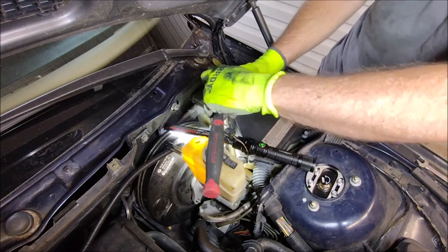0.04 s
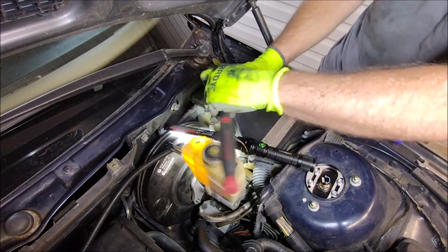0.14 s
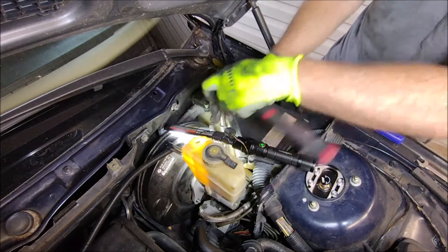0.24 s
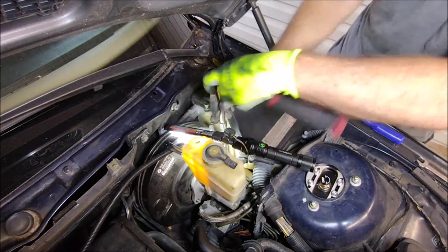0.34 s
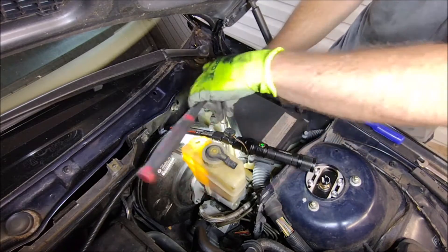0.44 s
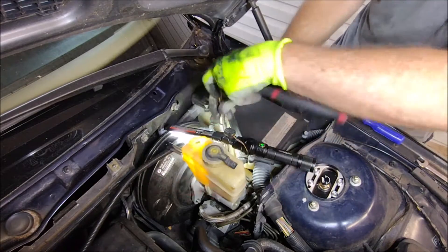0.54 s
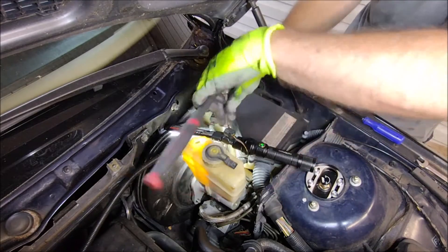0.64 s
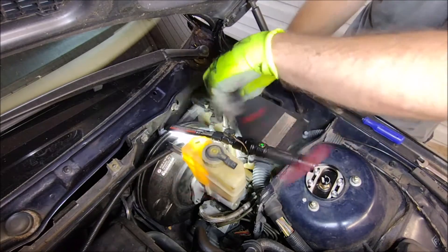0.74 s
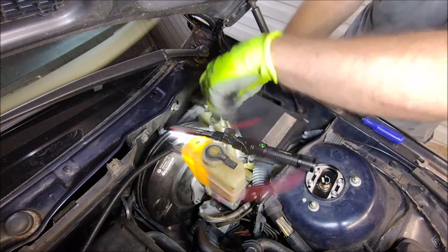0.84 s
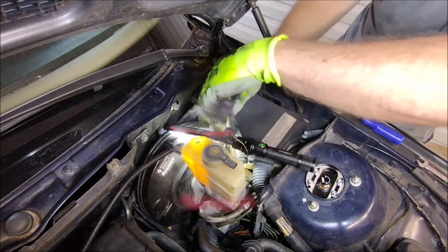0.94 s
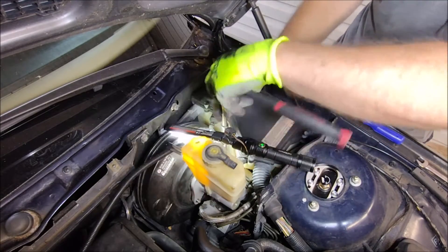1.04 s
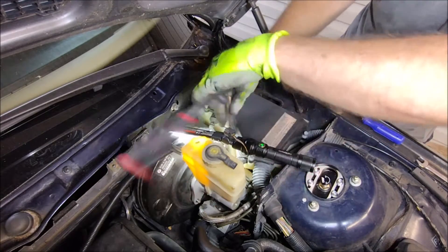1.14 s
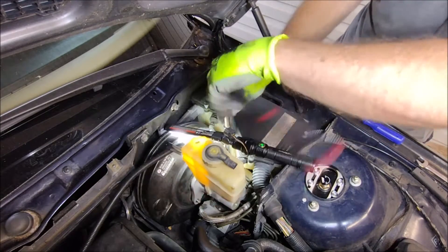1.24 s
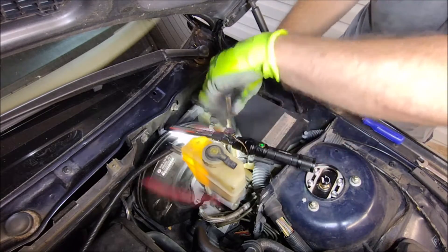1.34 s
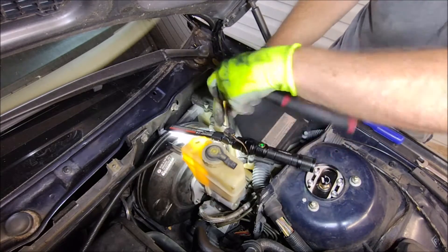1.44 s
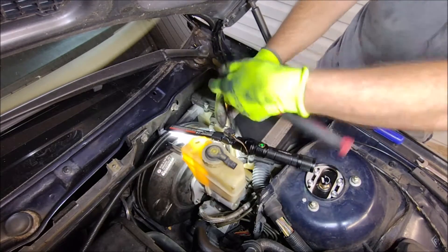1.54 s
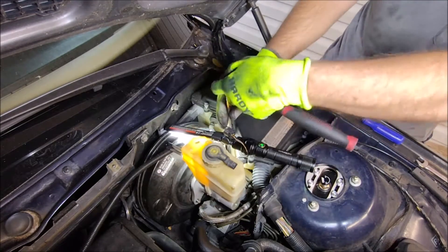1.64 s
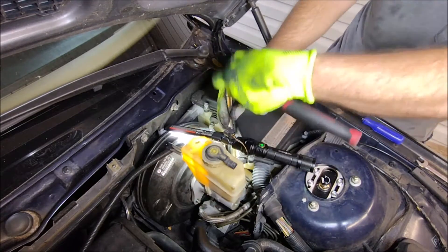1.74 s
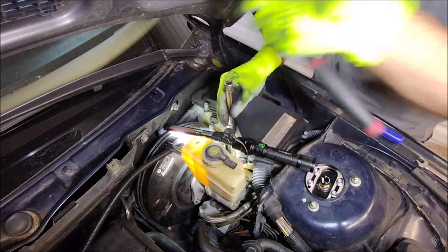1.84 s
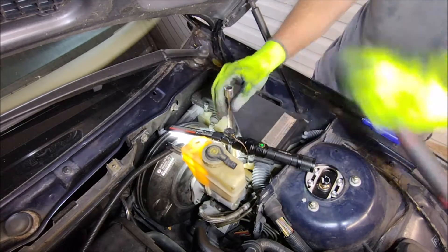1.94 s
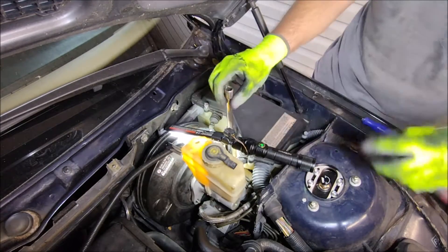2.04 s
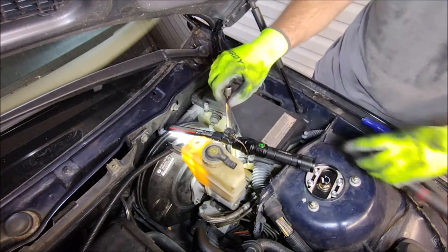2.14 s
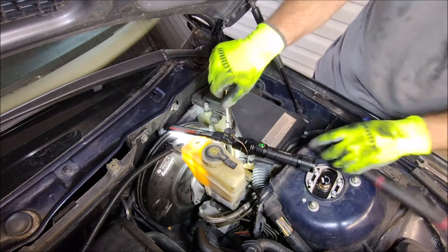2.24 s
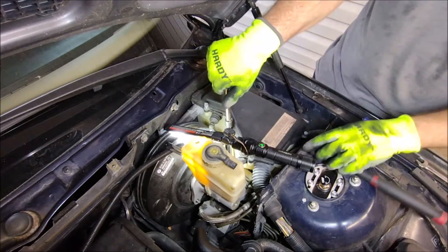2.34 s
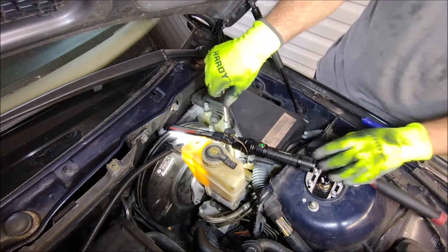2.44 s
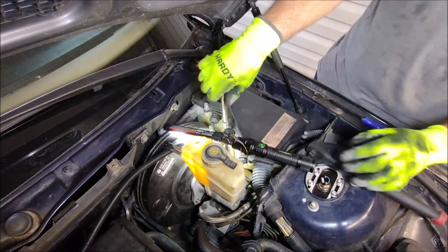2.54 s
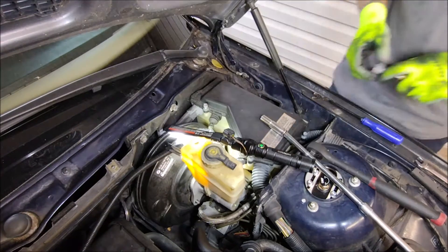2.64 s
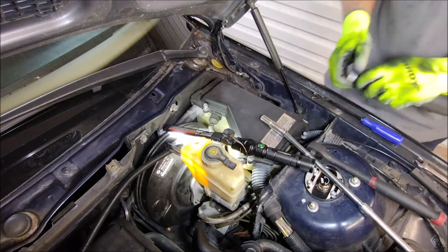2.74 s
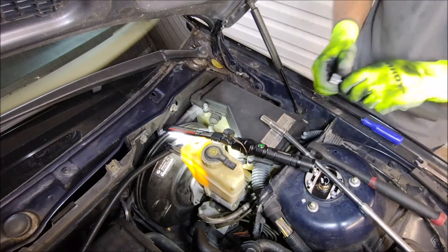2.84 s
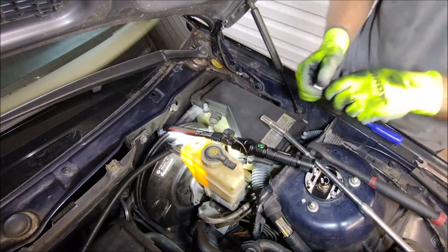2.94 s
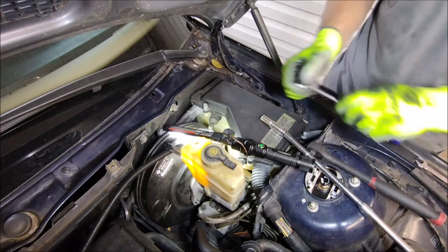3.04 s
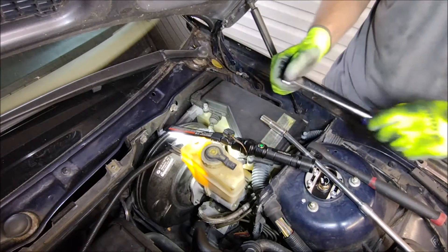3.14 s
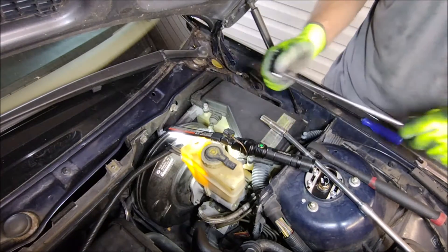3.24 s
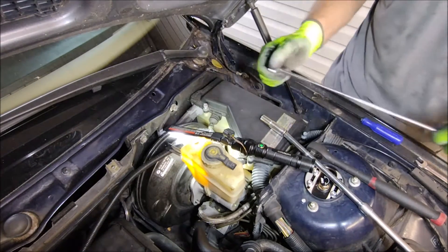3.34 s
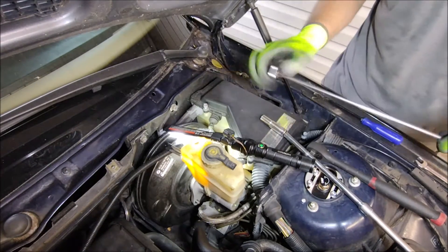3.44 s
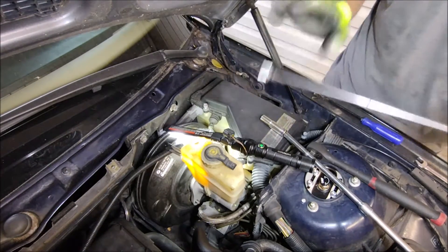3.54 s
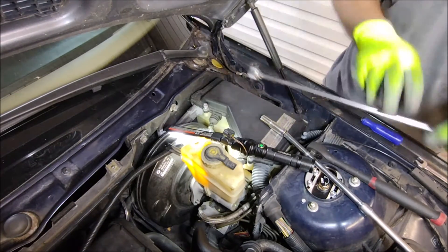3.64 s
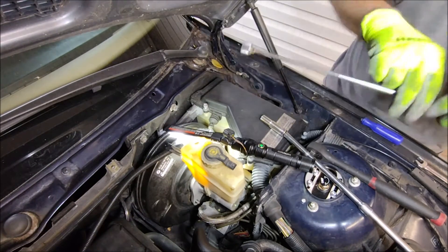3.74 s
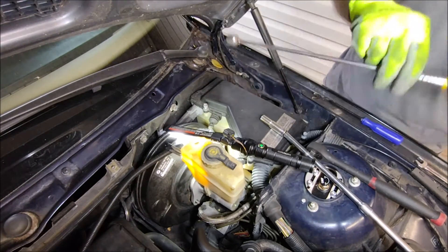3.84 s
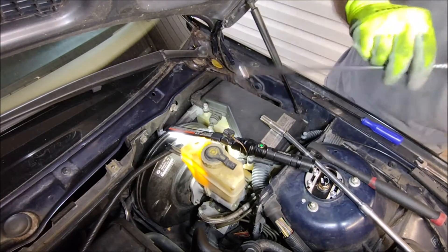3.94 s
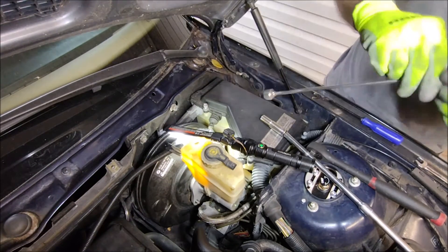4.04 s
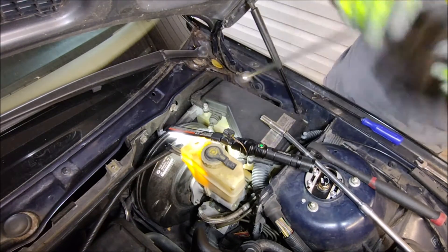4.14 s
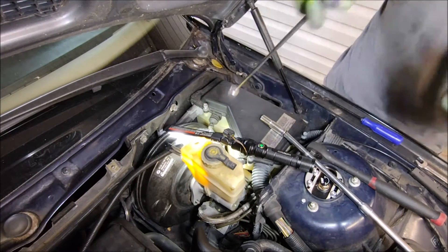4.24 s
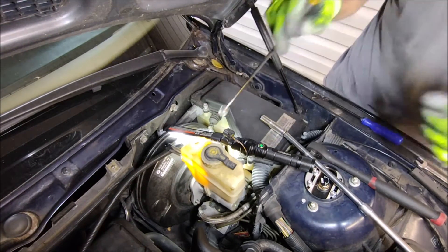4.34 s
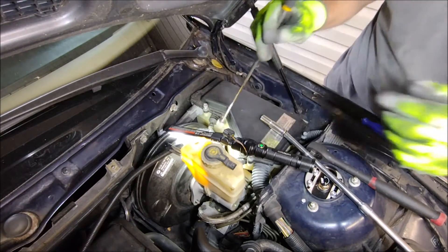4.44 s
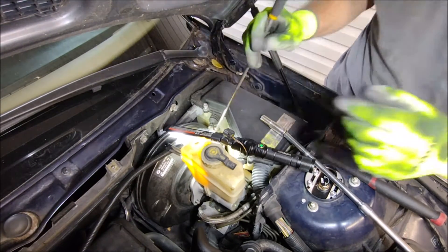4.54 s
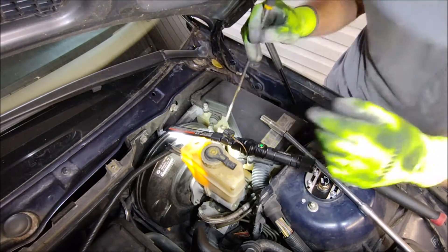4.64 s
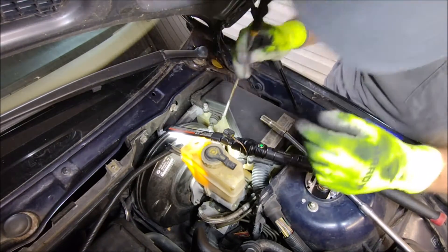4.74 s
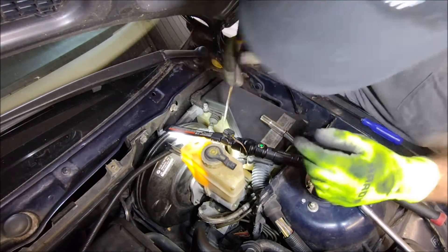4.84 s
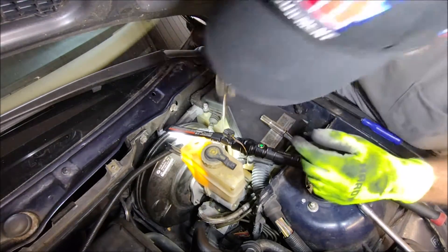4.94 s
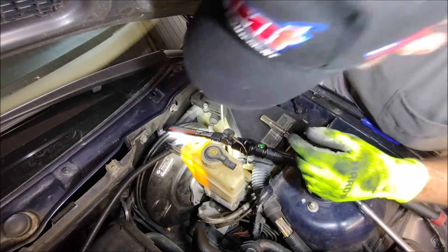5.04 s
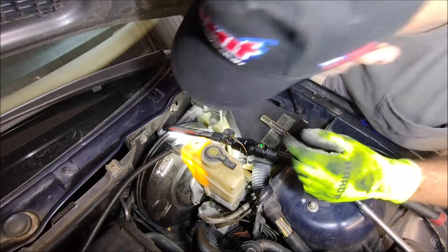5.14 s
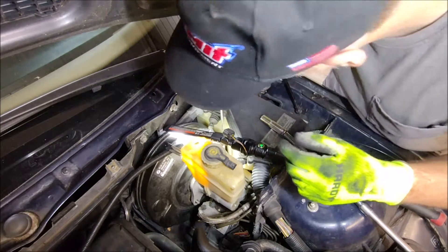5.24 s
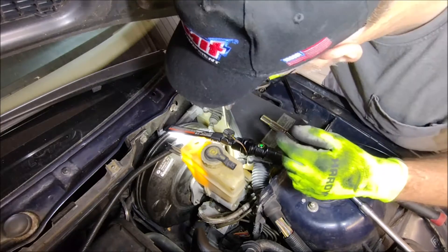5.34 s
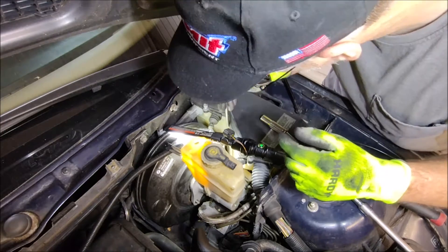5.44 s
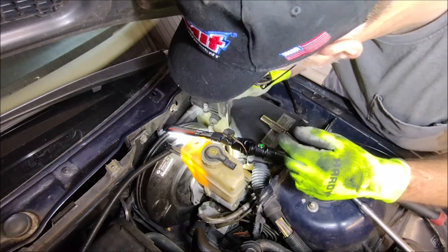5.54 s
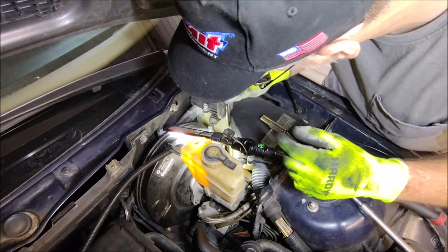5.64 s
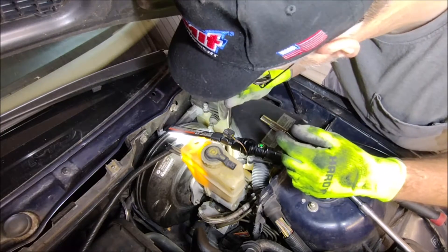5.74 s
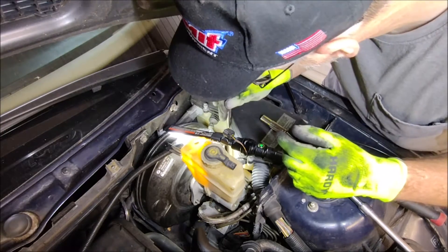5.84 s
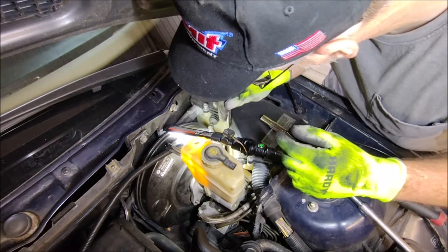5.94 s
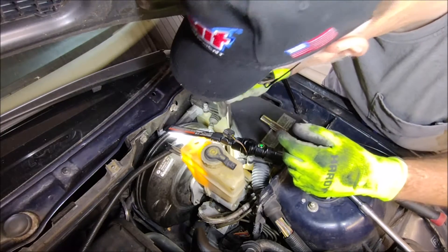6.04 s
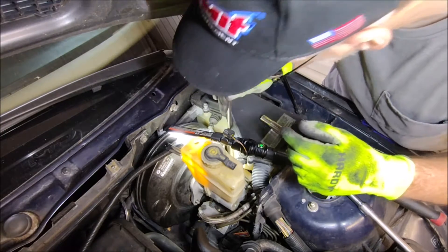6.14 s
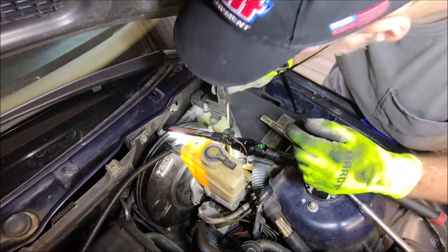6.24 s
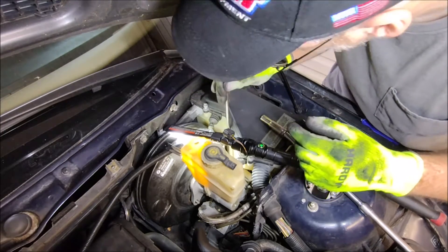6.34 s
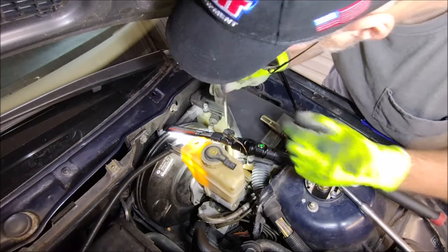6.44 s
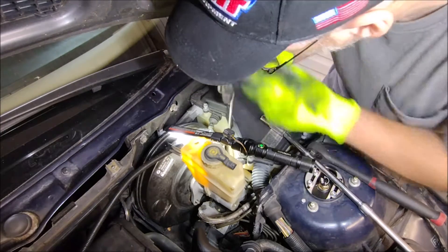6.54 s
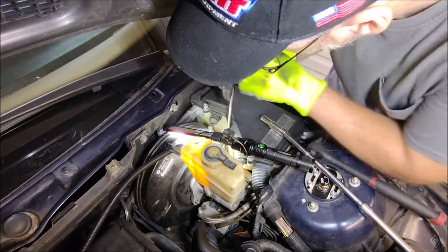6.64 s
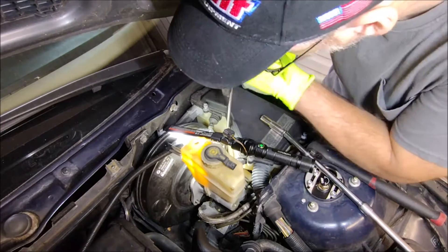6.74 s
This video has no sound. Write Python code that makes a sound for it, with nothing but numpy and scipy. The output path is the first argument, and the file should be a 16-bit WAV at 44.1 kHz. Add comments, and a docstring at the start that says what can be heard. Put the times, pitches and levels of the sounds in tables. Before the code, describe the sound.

Close in a car's engine bay, a ratchet wrench whirs through six very fast bursts of bright steel clicks, with a loose socket knocking between them. The wrench clatters onto sheet metal. After a pause with soft low bumps, a thin steel rod taps, scrapes and squeaks briefly. The garage echoes lightly over a faint, steady fan.

```python
"""In a garage, in the engine bay of a parked car, a ratchet wrench runs out a bolt in six quick back-swings.
Each tooth clicks and rings the steel head, while the loose socket knocks in filtered bursts of noise.
The wrench is laid on the bodywork with a clack; then a long thin steel rod taps, scrapes and squeaks.
Arms bump the fender in sagging low tones and make it shudder, gloves slide along the rod,
the garage echoes, and a steady fan of coloured noise runs in the background."""
import sys
import numpy as np
from scipy import signal
from scipy.fft import rfft, irfft
from scipy.io import wavfile
from scipy.ndimage import uniform_filter1d

SR = 44100
rng = np.random.default_rng(int(sys.argv[2]) if len(sys.argv) > 2 else 0)


def unload_audio(sound):
    """Save the sound as a 16-bit wav file, at the path given as the first command line argument."""
    columns = np.transpose(np.atleast_2d(sound))
    # keep every value between -1 and 1, then stretch to whole-number steps
    steps = np.round(np.clip(columns, -1, 1) * 32767)
    wavfile.write(sys.argv[1], SR, steps.astype(np.int16))


N = 299736
TIME = np.arange(N) / SR  # seconds
HIT_SIZE = 8192  # samples in one hit
CUTOFF_HZ = 16000

# colour of the fan and room noise: [pitch_hz, level_db]
FAN_COLOUR = [(15, -97), (25, -43), (97, -12.5), (130, -6), (217, -7), (249, 8), (301, -14), (373, -11),
              (489, -14.5), (818, -15), (1290, -18), (1700, -18), (2220, -17.5), (5430, -21.5),
              (16000, -40.5)]
# resonances in that noise: [pitch_hz, width_hz, lift_db]
FAN_MODES = [(234.6, 10.5, -8), (264.4, 31, -9.5), (621.6, 19, 9.5), (780, 7.2, 5), (840, 180, 5.5),
             (1004, 29, 10), (1117, 8.8, 10.5), (1420, 300, 4)]
FAN_DB = -58
# how alike left and right are in sound from all sides: [pitch_hz, likeness_0_to_1]
LIKENESS = [(50, 0.86), (250, 0.94), (1000, 0.9), (1800, 0.044), (4000, 0.21), (12000, 0.0196)]
# left minus right: [pitch_hz, difference_db]
BALANCE = [(30, -10), (70, -9), (150, -3.5), (260, -2.5), (600, -1.5), (1200, 4), (2500, -4), (5000, 0),
           (8000, -2), (14000, -2.5)]
# colour of the garage echo: [pitch_hz, level_db]
GARAGE_COLOUR = [(80, -2.5), (180, -0.5), (246, 3), (330, -5), (600, -17), (1000, -10), (1700, -16),
                 (2450, -16.5), (3100, -13.5), (4500, -10), (8000, -30), (15000, -40.5)]
GARAGE_T60_S = 0.74  # time to fall by 60 dB

# the working arm leans on the bodywork: [start_s, end_s, level_db]
LEANING = [(0, .5, -54.5), (.6, 1.88, -58)]
# colour of the trembling bodywork: [pitch_hz, level_db]
SHUDDER_COLOUR = [(30, -18), (70, -13), (140, 2), (210, -10), (246, 13), (290, -24), (450, -8.5),
                  (1200, -29.5)]
JOLT_DB, JOLT_S = -53.5, 0.11  # one more jolt after each back-swing
SHUDDER_ATTACK_S, SHUDDER_RELEASE_S = 0.02, 0.075
# soft bumps on the fender: [start_s, level_db, starting_pitch_hz, t60_s]
BUMPS = [(0.002, -35.5, 278, .05), (0.028, -40, 135, 0.076), (2.553, -42.5, 248, 0.15),
         (2.746, -46.5, 169, 0.07), (3.354, -37.5, 194, 0.16), (4.17, -46, 280, 0.067),
         (4.833, -43, 335, 0.16), (5.118, -40, 143, 0.13), (5.147, -37.5, 187, 0.15),
         (5.531, -43.5, 273, 0.17), (5.88, -47, 203, .11), (6.32, -44, 184, 0.095),
         (6.379, -34, 215, 0.028)]
# gloves slide along the rod: [start_s, end_s, level_db]
GLOVE_SLIDES = [(3.48, 3.6, -77), (3.85, 3.91, -58)]
# colour of the sliding gloves: [pitch_hz, level_db]
GLOVE_COLOUR = [(1000, -42), (3000, 5), (8000, -2), (15000, -10)]
GLOVE_ATTACK_S, GLOVE_RELEASE_S = 0.053, 0.039

# the rod's tip slips along the bracket: [start_s, end_s, scrape_db, squeak_db]
SLIPS = [(4.973, 5.023, -50, -53), (5.025, 5.054, -35, -38), (5.049, 5.104, -45, -39),
         (6.609, 6.638, -49, -72), (6.647, 6.678, -53.5, -72)]
# colour of the scrape: [pitch_hz, level_db]
SCRAPE_COLOUR = [(200, -22.5), (330, -2), (500, -8), (900, -1.5), (1100, -9), (1350, -6), (1480, -6),
                 (1850, 2), (2150, -4.5), (2600, -10), (3500, -11), (7000, -24), (15000, -33)]
SLIP_ATTACK_S, SLIP_RELEASE_S = 0.025, 0.0059
# notes of a squeak: [pitch_ratio, level_db]
SQUEAK_PARTIALS = [(1, 1), (1.66, -16), (2.74, -20)]
SQUEAK_HZ, SQUEAK_SAG_HZ_PER_S = 2080, 680  # each squeak falls a little as the tip slows
# the rod taps the bracket: [start_s, level_db, thud_db, hard_edge_db, favoured_hz, favoured_lift_db,
# reflections_db, ring_db, leading_tone_hz]
ROD_TAPS = [(4.834, 9.5, 0.5, 7, 8900, 13.5, 1, -35, 1297),
            (5.1005, 22, -23, -10.5, 1730, 9.5, -7.5, -29, 1560),
            (5.348, -11, -16, -18, 1850, 4, 1, -54.5, 1814),
            (5.3664, 10.5, 22, -0.5, 455, 10, -9, -64, 1297), (5.3739, 9, 16, -8, 620, -2, 6.5, -65, 1297),
            (5.479, -9.5, 21.5, -8, 1120, 11, 5, -70, 1297),
            (5.5057, 17, -16, 0.5, 3740, 1.5, -1, -35, 1814),
            (5.587, -10.5, -7, -17, 1060, 17, 0, -60, 1814),
            (5.9438, -5, 4.5, 23.5, 1350, 13, -5, -51, 1297),
            (6.127, -8.5, 17.5, -7, 720, 13, -2, -79, 1297),
            (6.17, 13.5, -15.5, 5.5, 1250, 5.5, -2.5, -38, 3830),
            (6.3195, -8, 2.5, 10, 1660, -2, -1, -59.5, 1814)]
# colour of the struck rod: [pitch_hz, level_db]
ROD_COLOUR = [(40, -58), (110, -28.5), (230, -5.5), (400, -6.5), (620, -3), (930, -3.5), (1250, -4.5),
              (1730, -7), (3600, -8), (5200, -13.5), (9200, -26.5), (16000, -31)]
# resonances of the rod: [pitch_hz, width_hz, lift_db]
ROD_MODES = [(352, 100, 2.5), (470, 33, 1), (607, 92, 2.5), (780, 68, 1.5), (947, 63, 6), (1130, 290, -1),
             (1614, 210, 9), (1760, 110, 6), (2046, 67, 2.5), (2500, 820, -4.5), (3114, 220, 5),
             (3290, 80, 5), (3960, 73, 5), (3730, 76, 3), (4550, 140, 8), (5600, 57, 6), (6770, 150, 6),
             (8330, 150, 3)]
# tones of the rod's free length: [pitch_hz, level_db, t60_s]
ROD_RINGS = [(1294, -3, 0.12), (1610, -9, 0.039), (1650, -8, .05), (1836, 3, 0.096), (2044, 5, 0.09),
             (2126, 1, 0.055), (2970, -7, 0.065), (3235, -17, .08), (3480, -6.5, 0.071), (3830, -0.5, 0.08),
             (3760, -15, 0.11), (4900, -8, .13), (5146, -35, .14), (7400, -17, .09), (7900, -20, 0.13),
             (8500, -13, 0.091)]

# the wrench lands and settles on the panel:
# [start_s, level_db, thud_db, hard_edge_db, favoured_hz, favoured_lift_db]
WRENCH_LANDINGS = [(2.335, 4.5, -16, -14.5, 915, 10), (2.3435, -3, -2, -12, 760, 10),
                   (2.356, -5, -1, -10, 745, 5), (2.399, 12.5, -7.5, -1.5, 1850, 5),
                   (2.4075, 5, 2.5, -10, 810, 12), (2.421, -7, 0, -1, 729, 11),
                   (2.4296, 5.5, -8, -8, 1660, 7), (2.4372, -1, 1, -13, 384, 6),
                   (2.4408, 5.5, -1, 7.5, 730, 5), (2.4447, 3.5, -7, 7, 4900, 10.5),
                   (2.4501, -0.5, 4, 3, 375, 2), (2.456, 2.5, 1.5, 7, 824, 4),
                   (2.463, -2.5, 9.5, -2, 390, 8.5), (2.476, -9.5, 4, -3, 810, 11)]
# colour of the struck panel: [pitch_hz, level_db]
PANEL_COLOUR = [(40, -37), (160, -11.5), (270, -7), (440, 0), (930, -3), (1400, 2), (1750, -4),
                (3600, -15.5), (9200, -22), (16000, -31)]
# resonances of the panel: [pitch_hz, width_hz, lift_db]
PANEL_MODES = [(238, 46, 6), (394, 41, 7), (479, 63, 7.5), (646, 51, 9), (729, 29, 10), (850, 90, 8),
               (1057, 104, 8), (1375, 370, -18.5), (1898, 57, 7.5), (2290, 114, 11), (2720, 130, 7.5),
               (3370, 340, 1), (4550, 65, 5), (6300, 700, -4.5), (7290, 160, 13.5), (8100, 500, 6),
               (11940, 400, 11)]

# the socket knocks on the bolt:
# [start_s, level_db, thud_db, hard_edge_db, favoured_hz, favoured_lift_db]
SOCKET_KNOCKS = [(.001, -14, 24.5, 26, 556, 5.5), (0.333, -6, 6.5, 2, 1840, 4),
                 (0.416, -6, -10.5, -13, 1240, 8), (0.587, -0.5, -2, 15, 1770, 14.5),
                 (0.6105, 5.5, 3, -41, 1150, 7.5), (0.679, 0, -3, -13, 1270, 0),
                 (0.776, -1, -3, -4, 1570, 6), (0.804, -11.5, 14.5, -15, 380, 9),
                 (0.835, -2, 1.5, 4, 1230, 11), (0.941, -14, 15, -14, 1760, 18),
                 (0.9749, 3.5, -2, -30, 1520, 4), (0.9965, -6.5, 8, -10, 1030, 9),
                 (1.131, 0.5, 4, -16, 1380, 9), (1.1674, -1, 1.5, 0, 1010, 10),
                 (1.201, -3, -12, 13, 1230, 16), (1.285, -2.5, 6, -9, 880, 3),
                 (1.361, -4.5, 4.5, -14, 1320, 14.5)]
# colour of the bolt's mount: [pitch_hz, level_db]
MOUNT_COLOUR = [(40, -31), (160, -16), (260, -7), (440, -2), (930, -5), (1730, -4), (3600, -10),
                (9200, -36), (16000, -48)]
# resonances of the mount: [pitch_hz, width_hz, lift_db]
MOUNT_MODES = [(250, 62, 9.3), (490, 23, 0.92), (1040, 28, 5.8), (1220, 56, 2.3), (1450, 86, 3.8),
               (2420, 108, 4.5)]
# the thud lies between the first two limits, the hard edge above the third
THUD_ABOVE_HZ, THUD_BELOW_HZ, EDGE_ABOVE_HZ = 338, 810, 6250
FOCUS_OCTAVES = 0.23  # width of the band that the struck spot favours

# back-swings of the handle: [start_s, end_s, teeth, start_slowness, level_db, treble_db,
# favoured_hz, favoured_lift_db]; half of start_slowness is the delay at mid-swing, as a share of the swing
SWINGS = [(0.469, 0.5546, 11, 0.003, 3, -2, 1790, 4), (0.6937, 0.76, 11, -0.018, -3, 7, 2400, 3.5),
          (0.8563, 0.9183, 12, .1, 3, 1.5, 2880, -1), (1.0348, 1.0907, 13, 0.1, 0.5, 4.5, 2520, 3.5),
          (1.198, 1.256, 13, .06, -.5, 5.5, 2410, 1.5), (1.33, 1.4, 15, 0.08, 0.5, 4, 2540, 5.5)]
# the pawl drops over a single tooth: [start_s, level_db]
LONE_TEETH = [(0.584, -15), (0.7825, -12), (1.115, -6.5), (1.575, -6), (1.587, -2)]
LONE_TOOTH_HZ, LONE_TOOTH_LIFT_DB = 2300, 2
# colour of a pawl click: [pitch_hz, level_db]
PAWL_COLOUR = [(100, -30.5), (250, -7.5), (500, -12), (1100, -8), (1800, -6), (3000, -6.5), (4500, -10.5),
               (6000, -9.5), (9000, -8.5), (13000, -2), (16000, -13)]
# resonances of the wrench: [pitch_hz, width_hz, lift_db]
WRENCH_MODES = [(1085, 37, 8.5), (2370, 57, 4), (7340, 380, 8.5), (9800, 2200, -2), (11820, 410, 4.5)]
# tones each tooth leaves in the steel head: [pitch_hz, level_db, t60_s]
HEAD_RINGS = [(2440, -62, 0.058), (7670, -64, .04), (12000, -57, 0.035), (12300, -46, 0.039)]
SWING_EASE = 0.03  # size of the timing bend that slows both ends, as a share of the swing
SOFT_START_DB, FIRM_AFTER_TEETH = -4.5, 1.13  # the first teeth click softly
TOOTH_JITTER_S, TOOTH_SPREAD_DB = 0.0002, 1.5
SWING_BRIGHTENS_DB = 6  # the treble grows this much from the first tooth to the last
PAWL_BOUNCE_S, PAWL_BOUNCE_DB = 0.0012, -1  # the pawl lands twice on each tooth


def from_db(db):
    """Turn decibels into gain."""
    return 10 ** (np.asarray(db) / 20)


def bins(size):
    """Frequencies in the spectrum of this many samples, none below 1 Hz."""
    return np.maximum(np.arange(size // 2 + 1) * SR / size, 1)


def at_hz(points, hz):
    """Read a table of pitch and value, with pitch spaced as the ear hears it (log)."""
    f, value = np.transpose(points)
    return np.interp(np.log(hz), np.log(f), value)


def peaks(modes, hz):
    """Add up the dB of a set of resonances; negative ones make dips."""
    return sum(db / (1 + (2 * (hz - f) / width) ** 2) for f, width, db in modes)


def favoured(hz, focus_hz, octaves=FOCUS_OCTAVES):
    """Weight (0-1) of the band that a contact favours."""
    return 1 / (1 + (2 * np.log2(hz / focus_hz) / octaves) ** 2)


def colour(x, db):
    """Filter with the given dB at each frequency, with no sound ahead of the hit (minimum phase)."""
    size = x.shape[-1]
    cepstrum = irfft(np.log(from_db(db)), size)
    fold = 1 + np.sign(size / 2 - np.arange(size))
    fold[0] = 1
    return irfft(rfft(x) * np.exp(rfft(cepstrum * fold)), size)


def diffuse(size):
    """White stereo noise from all sides; the likeness table sets how alike the sides are."""
    alike = np.clip(at_hz(LIKENESS, bins(size)), -.99, .99)
    mid, side = rfft(rng.standard_normal((2, size)))
    shared = np.sqrt(1 + alike) * mid
    opposed = np.sqrt(1 - alike) * side * [[1], [-1]]
    return irfft((shared + opposed) / np.sqrt(2), size)


def unit_energy(x):
    """Scale to the energy of a unit click, averaged over the channels."""
    return x / np.sqrt(np.mean(np.sum(x ** 2, axis=-1)))


def unit_rms(x):
    """Scale to an average (rms) strength of 1."""
    return x / np.sqrt(np.mean(x ** 2))


def add(out, s, sound):
    """Mix a sound in at a time in seconds."""
    at = max(round(s * SR), 0)
    out[:, at:at + sound.shape[1]] += sound[:, :N - at]


def swell(rows, attack_s, release_s):
    """Gain that rises, holds to the end of each row and dies away."""
    gain = 0
    for start, end, db in rows:
        rise = np.clip((TIME - start) / attack_s, 0, 1)
        fall = np.exp(-np.clip((TIME - end) / release_s, 0, 20))
        gain = gain + from_db(db) * rise * fall
    return gain


def decay(t, t60):
    """Fade by 60 dB in t60 seconds."""
    return np.exp(-np.log(1000) * t / t60)


def wash(spectrum, modes=()):
    """Steady noise from all sides in one colour, rms 1."""
    hz = bins(N)
    return unit_rms(colour(diffuse(N), at_hz(spectrum, hz) + peaks(modes, hz)))


def contact(crack_t60, bay_t60, bay_db, direct, rise_s, damping=1.64, damped_hz=5500):
    """A sharp crack, then its dense reflections in the engine bay, whose treble dies first."""
    t, hz = np.arange(HIT_SIZE) / SR, bins(HIT_SIZE)
    direct = np.clip(direct, 0, 1)  # share that is the same in both channels
    crack = np.sqrt(direct) * rng.standard_normal(HIT_SIZE) + np.sqrt(1 - direct) * diffuse(HIT_SIZE)
    crack = unit_energy(crack * decay(t, crack_t60) * (1 - np.exp(-t / rise_s)))
    echoes, fade = diffuse(HIT_SIZE), decay(t, bay_t60)
    dull = irfft(rfft(echoes) / (1 + (hz / damped_hz) ** 4))
    bright = echoes - dull
    bay = unit_energy((dull * fade + bright * fade ** damping) * np.minimum(t / 0.0033, 1))
    return unit_energy(crack + from_db(bay_db) * bay)


def blow(hit, body, modes, db, thud_db, edge_db, focus_hz, focus_db):
    """A contact rings a body: weight adds a thud, bare metal a hard edge, the struck spot favours a pitch."""
    hz = bins(HIT_SIZE)
    # even out the contact's spectrum, so the body alone decides which pitches ring
    power = np.mean(abs(rfft(hit)) ** 2, axis=0)
    uneven_db = 10 * np.log10(uniform_filter1d(power, size=41))
    thud = 1 / (1 + (hz / THUD_BELOW_HZ) ** 4) / (1 + (THUD_ABOVE_HZ / hz) ** 4)
    edge = 1 / (1 + (EDGE_ABOVE_HZ / hz) ** 3)
    stroke_db = db + thud_db * thud + edge_db * edge + focus_db * favoured(hz, focus_hz)
    body_db = at_hz(body, hz) + peaks(modes, hz)
    return colour(hit, stroke_db + body_db - uneven_db)


def ring(tones, spread_db, port_phase):
    """Fading sines, varying in strength at each strike and in phase at each microphone port."""
    t, out = np.arange(HIT_SIZE) / SR, 0
    for hz, db, t60 in tones:
        strength_db = db + spread_db * rng.standard_normal()
        phase = port_phase * rng.standard_normal((2, 1))
        out = out + from_db(strength_db) * np.sin(2 * np.pi * hz * t + phase) * decay(t, t60)
    return out * np.minimum(t / 0.0015, 1)


def fan(lag_s=.00022):
    """The fan stands off to the right, so its rush reaches the left port later."""
    left, right = from_db(FAN_DB) * wash(FAN_COLOUR, FAN_MODES)
    return np.array([np.roll(left, round(lag_s * SR)), right])


def garage(x, size=32768):
    """The room's tail builds up after the nearby reflections and dies evenly."""
    t = np.arange(size) / SR
    build_up = np.minimum(t / 0.0088, 1)
    tail = unit_energy(diffuse(size) * decay(t, GARAGE_T60_S) * build_up)
    return signal.fftconvolve(x, colour(tail, at_hz(GARAGE_COLOUR, bins(size))), axes=1)[:, :N]


def shudder():
    """The bodywork trembles under the leaning arm, with a jolt after each back-swing."""
    jolts = [(end, end + JOLT_S, JOLT_DB) for _, end, *_ in SWINGS]
    pressure = swell(list(LEANING) + jolts, SHUDDER_ATTACK_S, SHUDDER_RELEASE_S)
    return pressure * wash(SHUDDER_COLOUR)


def bumps(rise_s=0.0073, dull_db=-8, sag_s=0.11, pan_db=3):
    """A soft push makes the fender swing for a few cycles, its pitch sagging as the push eases."""
    out, t, hz = np.zeros((2, N)), np.arange(HIT_SIZE) / SR, bins(HIT_SIZE)
    for s, db, pitch, t60 in BUMPS:
        around_pitch_db = -30 * np.log10(1 + (hz / pitch - pitch / hz) ** 2)
        thud = unit_rms(colour(diffuse(HIT_SIZE), around_pitch_db))
        tone = np.sin(2 * np.pi * pitch * sag_s * np.log(1 + t / sag_s))
        push = np.sin(np.pi / 2 * np.minimum(t / rise_s, 1)) ** 2
        add(out, s, from_db(db) * (tone + from_db(dull_db) * thud) * push * decay(t, t60))
    return out * from_db([[-pan_db], [pan_db]])  # louder on the right


def gloves():
    """Gloves rub along the rod with a soft rush of noise."""
    return swell(GLOVE_SLIDES, GLOVE_ATTACK_S, GLOVE_RELEASE_S) * wash(GLOVE_COLOUR)


def scrape(slips_per_s=1200, hiss_db=-22):
    """Tiny stick-slips of the tip, as random clicks, ring the rod."""
    hz = bins(N)
    clicks = (rng.random(N) < slips_per_s / SR) * rng.standard_normal(N)
    rubbing = clicks + from_db(hiss_db) * diffuse(N)
    pressure = swell([row[:3] for row in SLIPS], SLIP_ATTACK_S, SLIP_RELEASE_S)
    return pressure * unit_rms(colour(rubbing, at_hz(SCRAPE_COLOUR, hz) + peaks(ROD_MODES, hz)))


def squeak(rough=0.64, waver_hz=22):
    """While it slips, the tip sings on one nearly steady note with faint upper partials."""
    out = np.zeros((2, N))
    waver = waver_hz * unit_rms(uniform_filter1d(rng.standard_normal(N), size=400))
    for start, end, _, db in SLIPS:
        pitch = SQUEAK_HZ - SQUEAK_SAG_HZ_PER_S * np.clip(TIME - start, 0, end - start) + waver
        phase = 2 * np.pi * np.cumsum(pitch) / SR
        note = sum(from_db(partial_db) * np.sin(ratio * phase) for ratio, partial_db in SQUEAK_PARTIALS)
        out += swell([(start, end, db)], SLIP_ATTACK_S, SLIP_RELEASE_S) * note
    roughness = unit_rms(uniform_filter1d(rng.standard_normal((2, N)), size=200))
    return out * (1 + rough * roughness)


def rod_ring(ring_hz, lift_db=9, octaves=.12):
    """The rod's free length sings in a cluster of tones; where it is held decides which one leads."""
    tones = [(hz, db + lift_db * favoured(hz, ring_hz, octaves), t60) for hz, db, t60 in ROD_RINGS]
    return ring(tones, spread_db=2.0, port_phase=0.42)


def rod_taps(damped_per_db=.018):
    """Dry taps of the rod's tip leave a thin ring; weight holds the rod still, so the tap dies sooner."""
    out = np.zeros((2, N))
    for s, *stroke, bay_db, ring_db, ring_hz in ROD_TAPS:
        thud_db = stroke[1]
        free = np.exp(-damped_per_db * max(thud_db, 0))
        hit = contact(crack_t60=0.017 * free, bay_t60=0.14 * free, bay_db=bay_db, direct=0.8,
                      rise_s=0.0005, damping=1.7)
        tap = blow(hit, ROD_COLOUR, ROD_MODES, *stroke)
        add(out, s, tap + from_db(ring_db) * rod_ring(ring_hz))
    return out


def wrench_on_panel():
    """Head and handle of the wrench land on the sheet metal in turn and ring it."""
    out = np.zeros((2, N))
    for s, *stroke in WRENCH_LANDINGS:
        hit = contact(crack_t60=0.012, bay_t60=0.125, bay_db=-4.5, direct=0.13, rise_s=0.00071)
        add(out, s, blow(hit, PANEL_COLOUR, PANEL_MODES, *stroke))
    return out


def socket():
    """The loose socket knocks on the bolt and rings its mount."""
    out = np.zeros((2, N))
    for s, *stroke in SOCKET_KNOCKS:
        hit = contact(crack_t60=0.012, bay_t60=0.09, bay_db=-1.5, direct=0.94, rise_s=0.0004)
        add(out, s, blow(hit, MOUNT_COLOUR, MOUNT_MODES, *stroke))
    return out


def tooth_clicks():
    """The handle speeds up and brakes; the pawl snaps harder once it is under way."""
    # each click: start_s, level_db, treble_db, favoured_hz, favoured_lift_db
    clicks = [(s, db, 0, LONE_TOOTH_HZ, LONE_TOOTH_LIFT_DB) for s, db in LONE_TEETH]
    for start, end, teeth, lean, swing_db, treble_db, *tone in SWINGS:
        tooth = np.arange(int(round(teeth)))
        turn = tooth / tooth[-1]  # 0 at the first tooth, 1 at the last
        when = turn + SWING_EASE * np.sin(2 * np.pi * turn) + lean * np.sin(np.pi * turn) / 2
        slip, force = rng.standard_normal((len(tooth), 2)).T
        times = start + (end - start) * when + TOOTH_JITTER_S * slip
        firmness_db = SOFT_START_DB * np.exp(-tooth / FIRM_AFTER_TEETH)
        levels = swing_db + firmness_db + TOOTH_SPREAD_DB * force
        trebles = treble_db + SWING_BRIGHTENS_DB * (turn - .5)
        clicks += [(*click, *tone) for click in zip(times, levels, trebles)]
    return clicks


def ratchet(grip_db=4.0, detune=0.018, repeat=.5):
    """Partly alike pawl clicks ring the steel head; the shifting grip changes and detunes each mode."""
    out, hz = np.zeros((2, N)), bins(HIT_SIZE)
    treble = 1 / (1 + (5000 / hz) ** 2)
    clicks = tooth_clicks()
    for s, db, *_ in clicks:
        add(out, s, from_db(db) * ring(HEAD_RINGS, spread_db=-3, port_phase=1.0))
    clicks += [(s + PAWL_BOUNCE_S, db + PAWL_BOUNCE_DB, *tone) for s, db, *tone in clicks]
    # one crack shared by all clicks, then one of each click's own
    usual, *own = [contact(crack_t60=.006, bay_t60=0.089, bay_db=-2.5, direct=0.1, rise_s=0.001)
                   for _ in range(len(clicks) + 1)]
    grips = rng.standard_normal((len(clicks), len(WRENCH_MODES), 2))
    for (s, db, treble_db, focus_hz, focus_db), variation, grip in zip(clicks, own, grips):
        modes = [(f * (1 + detune * shift), width, mode_db + grip_db * hold)
                 for (f, width, mode_db), (hold, shift) in zip(WRENCH_MODES, grip)]
        click = np.sqrt(repeat) * usual + np.sqrt(1 - repeat) * variation
        steel_db = at_hz(PAWL_COLOUR, hz) + peaks(modes, hz)
        snap_db = db + treble_db * treble + focus_db * favoured(hz, focus_hz)
        add(out, s, colour(click, steel_db + snap_db))
    return out


def scene():
    """Mix the tools in the bay, their echo in the garage and the steady fan."""
    wrench = from_db(-6.0) * ratchet() + from_db(-0.5) * socket()
    clack = from_db(2.5) * wrench_on_panel()
    rod = from_db(-2.0) * rod_taps() + scrape() + squeak()
    body = bumps() + from_db(-5.0) * shudder() + gloves()
    echo = garage(from_db(6.0) * wrench + from_db(-1.0) * clack + from_db(-11.5) * rod)
    return wrench + clack + rod + body + echo + fan()


def record(dry):
    """The two microphone ports differ in colour; a steep filter cuts the top."""
    tilt_db = at_hz(BALANCE, bins(N)) / 2
    ports = np.array([colour(dry[0], tilt_db), colour(dry[1], -tilt_db)])
    top_cut = signal.ellip(12, .1, 70, CUTOFF_HZ, fs=SR, output="sos")
    return signal.sosfilt(top_cut, ports)


dry = scene()
out = record(dry)
unload_audio(out)
```